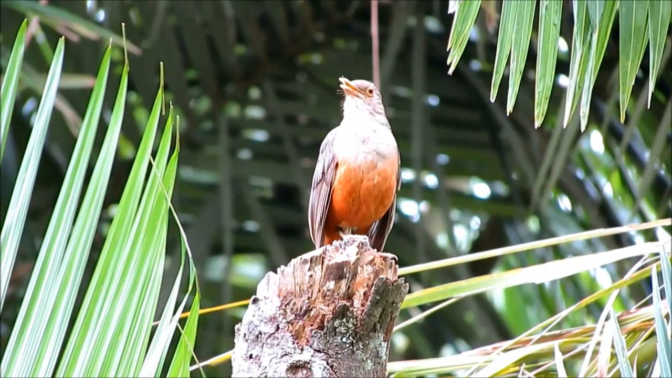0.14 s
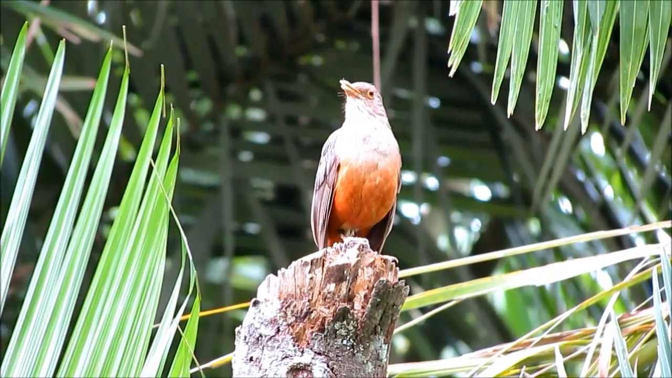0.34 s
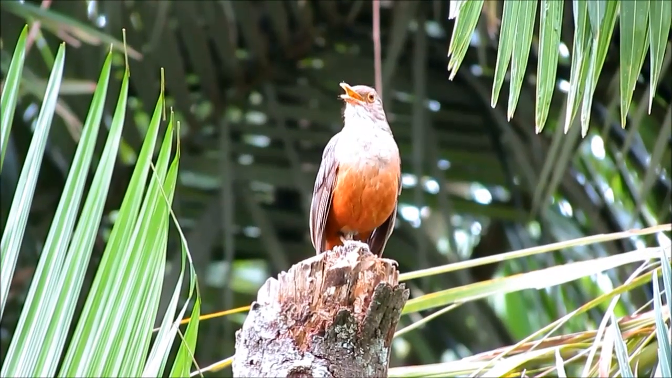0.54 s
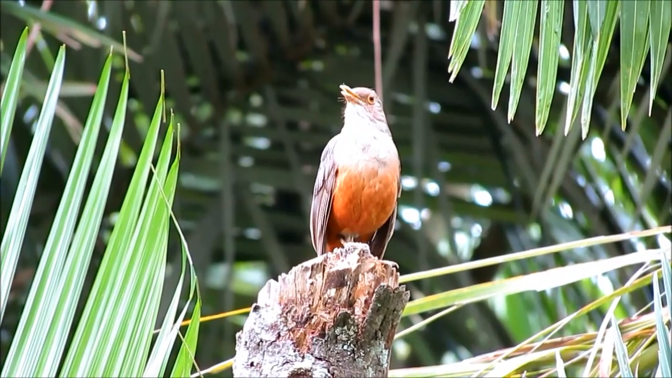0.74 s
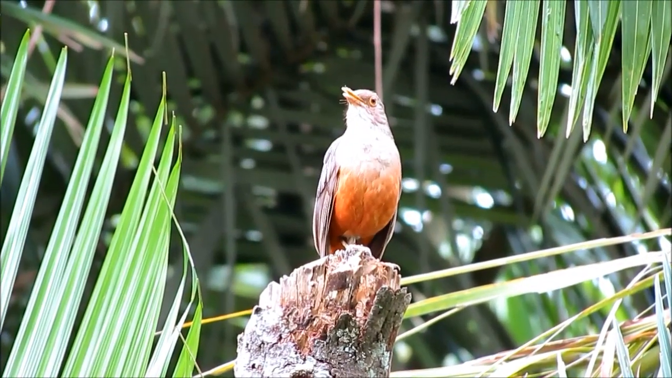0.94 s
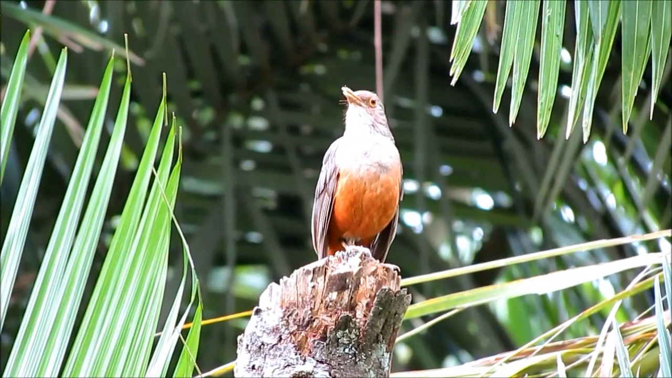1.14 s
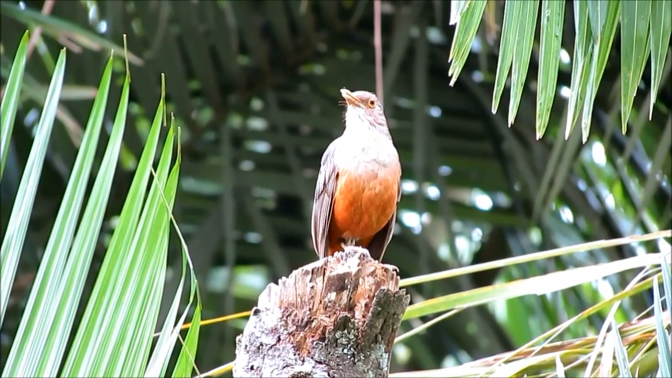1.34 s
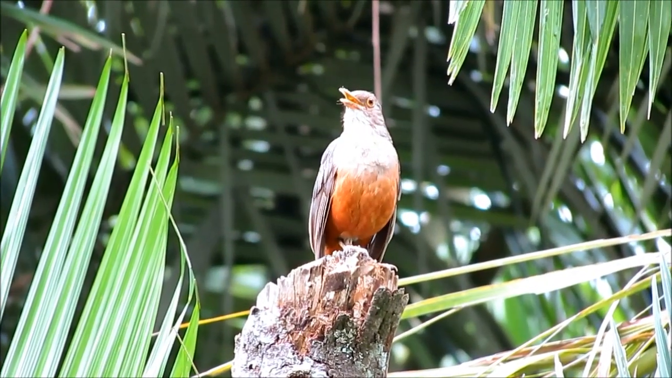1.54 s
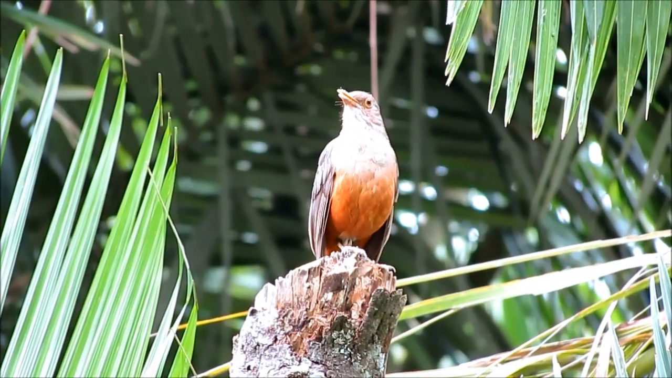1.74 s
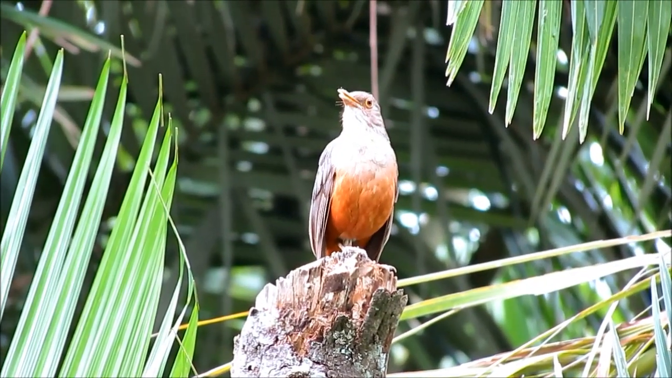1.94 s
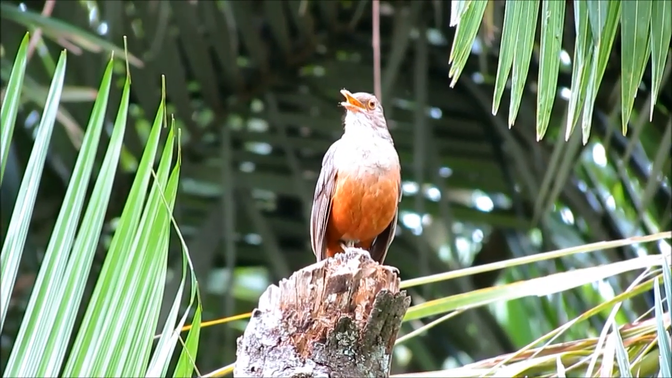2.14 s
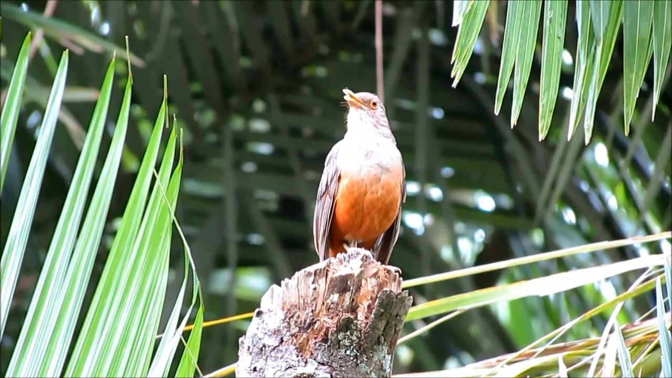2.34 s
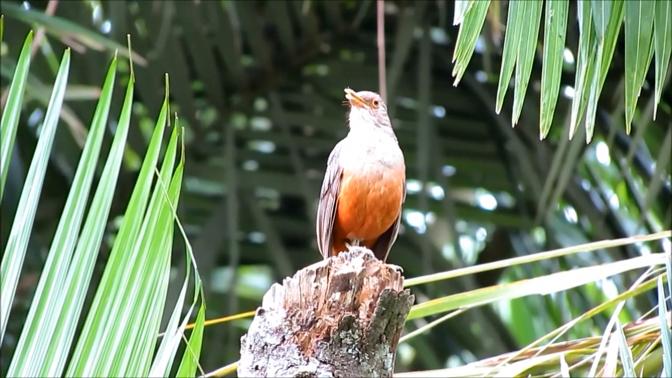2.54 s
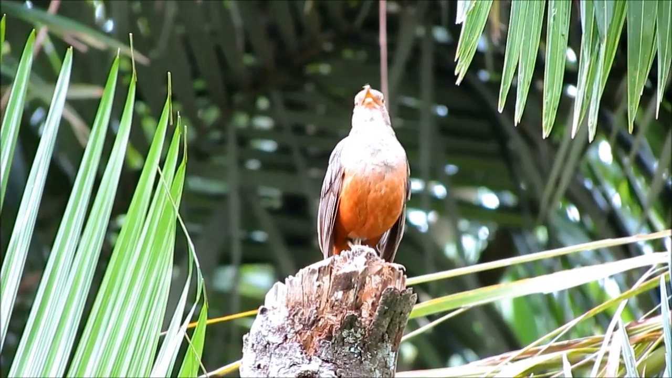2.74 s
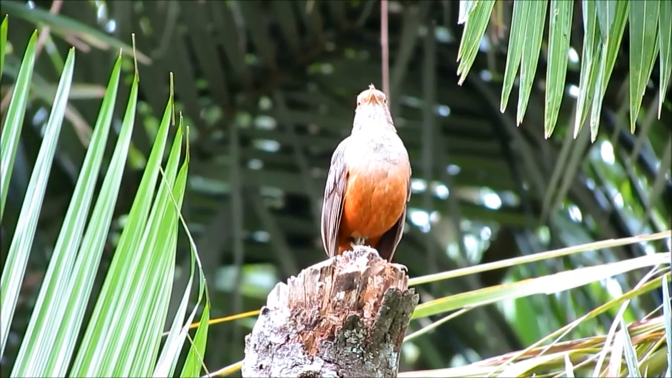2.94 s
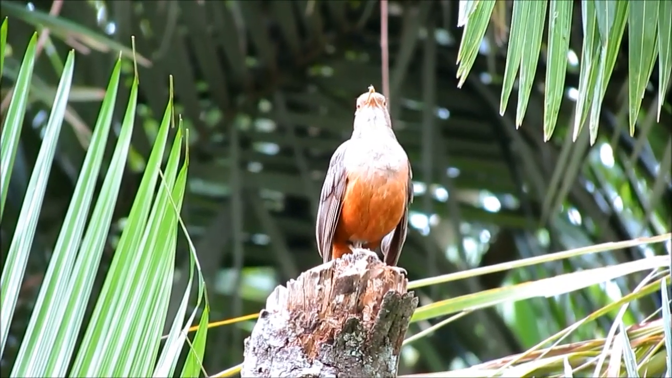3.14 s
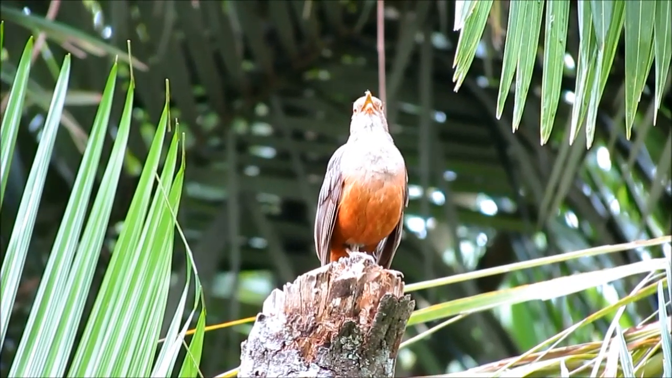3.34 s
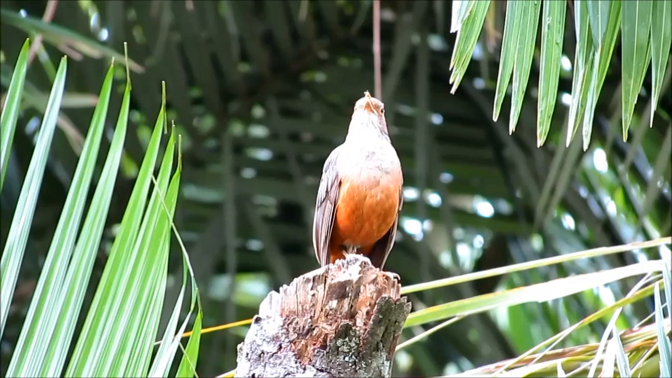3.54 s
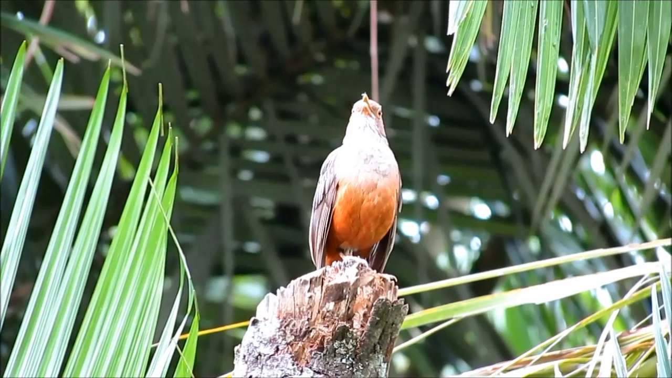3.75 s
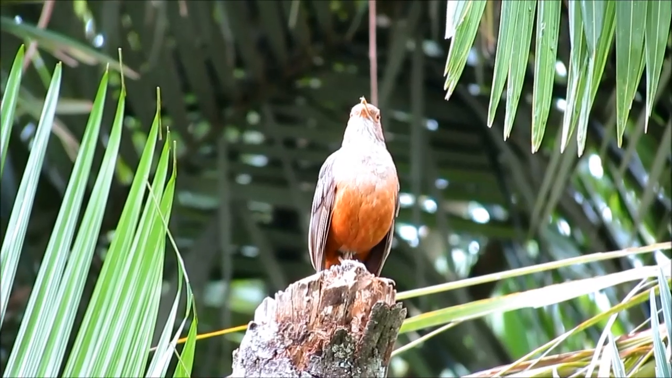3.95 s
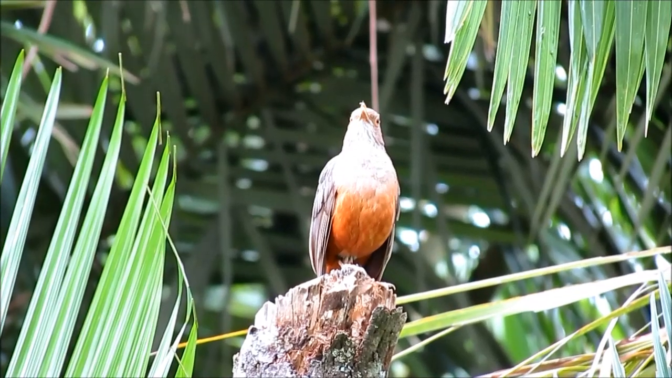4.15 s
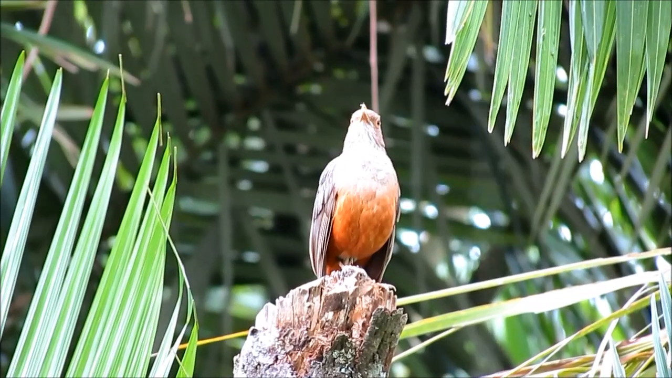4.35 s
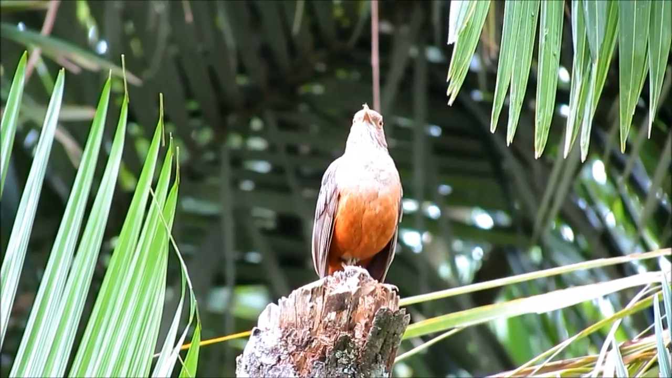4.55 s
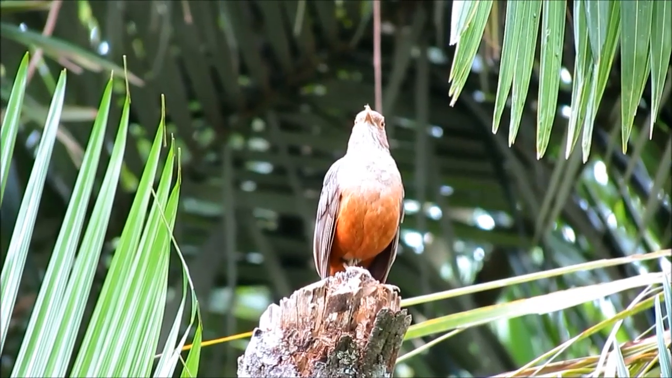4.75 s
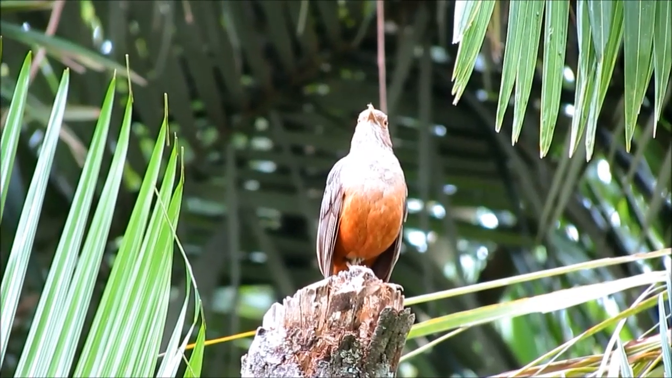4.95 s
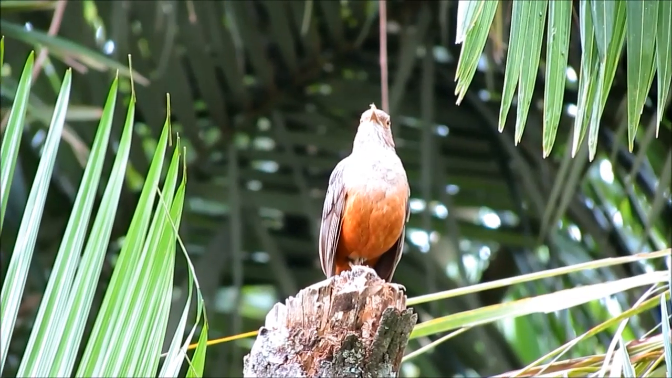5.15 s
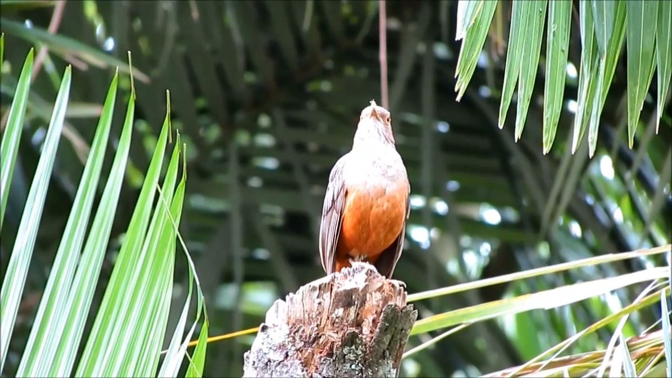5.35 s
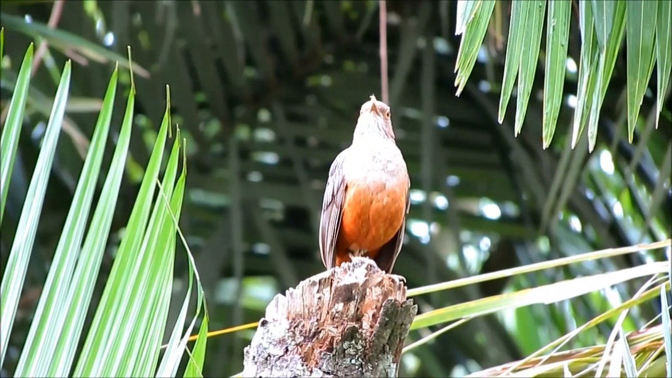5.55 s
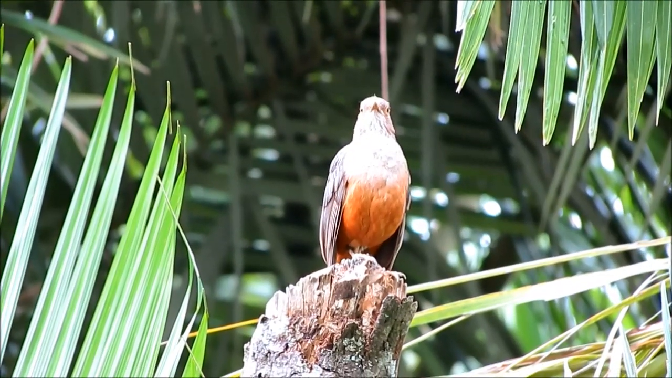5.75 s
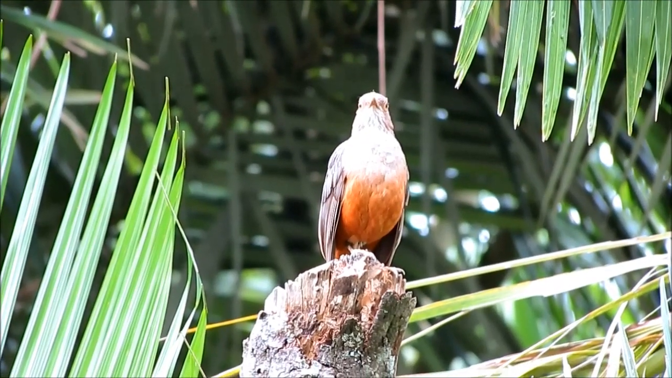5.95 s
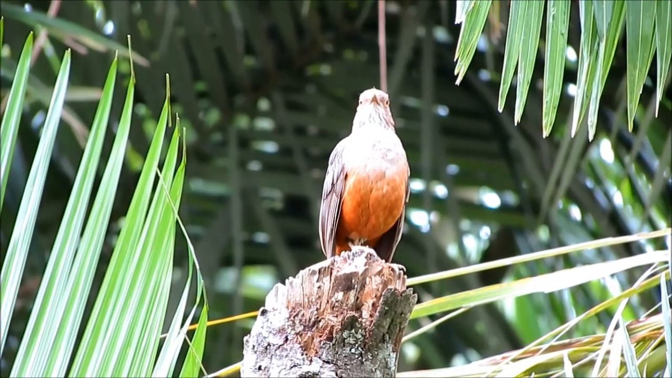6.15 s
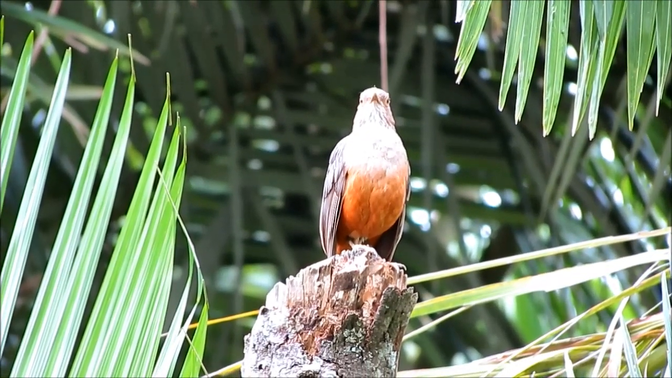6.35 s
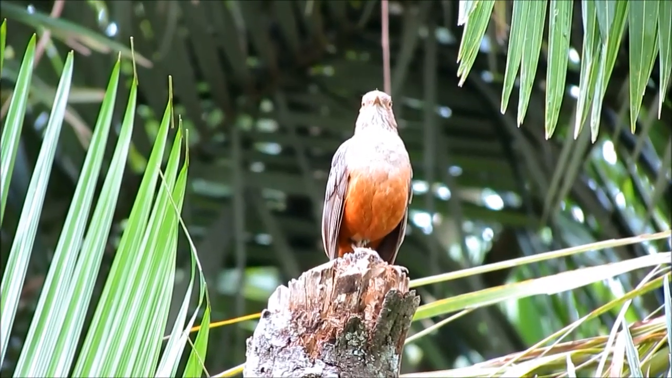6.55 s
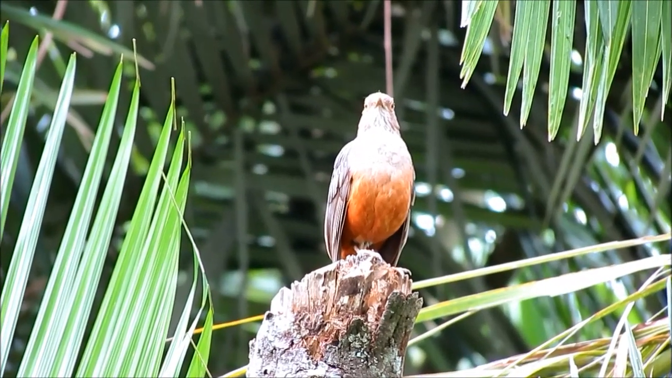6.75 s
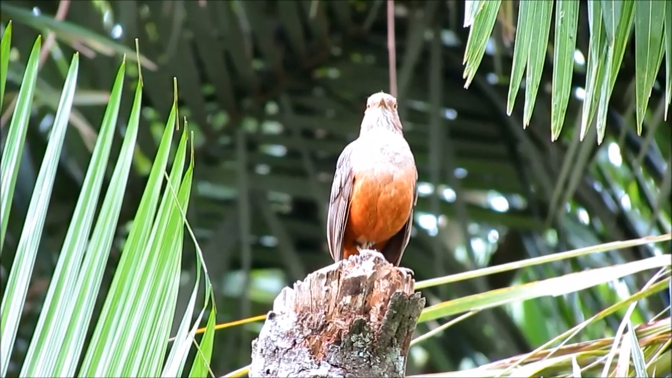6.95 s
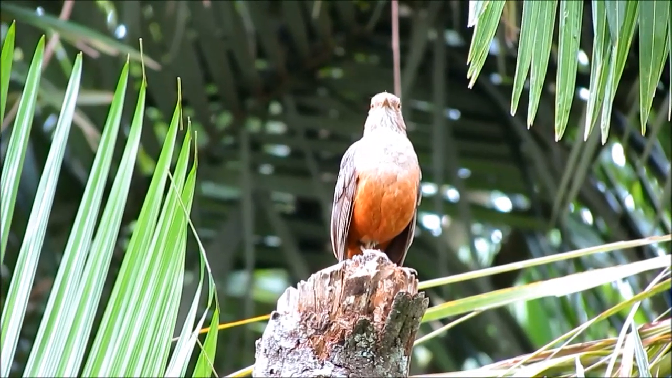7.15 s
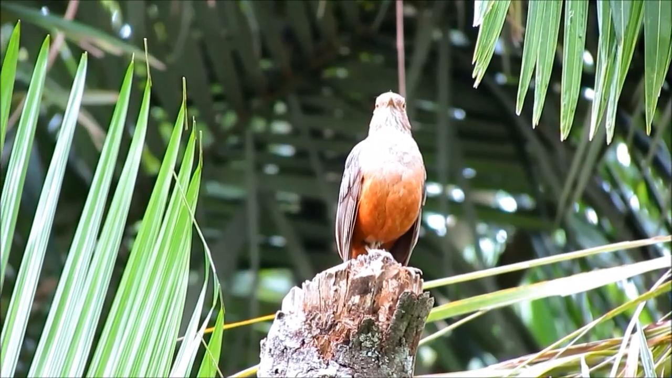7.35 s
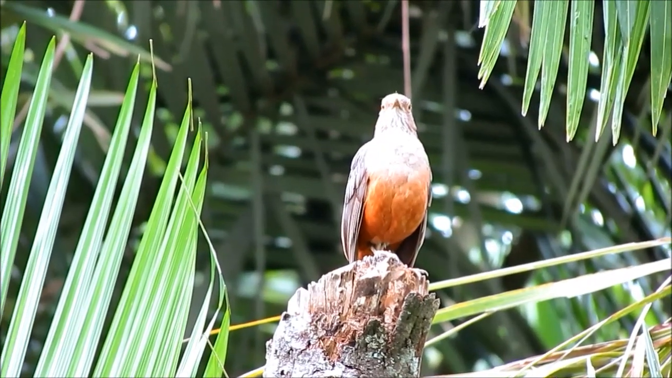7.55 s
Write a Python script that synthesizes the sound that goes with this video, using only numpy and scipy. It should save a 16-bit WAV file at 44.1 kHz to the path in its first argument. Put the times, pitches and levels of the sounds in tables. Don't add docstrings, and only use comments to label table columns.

```python
import sys
import numpy as np
from scipy import signal
from scipy.fft import rfft, irfft, next_fast_len
from scipy.io import wavfile
from scipy.ndimage import uniform_filter1d

SR = 44100
rng = np.random.default_rng(int(sys.argv[2]) if len(sys.argv) > 2 else 0)


def log_audio(samples):
    frames = np.atleast_2d(samples).T
    limited = np.clip(frames, -1, 1)
    pcm = np.round(limited * 32767).astype(np.int16)
    wavfile.write(sys.argv[1], SR, pcm)


def linear_from_db(decibels):
    return 10 ** (np.asarray(decibels, float) / 20)


N = 339129


def evened(x):
    return x / np.sqrt(np.mean(x ** 2) + 1e-20)


def smooth_noise(shape, width):
    once = uniform_filter1d(rng.standard_normal(shape), width)
    return evened(uniform_filter1d(once, width))


def read(points, hz):
    f, value = np.transpose(points)
    return np.interp(np.log(hz + 1), np.log(f + 1), value)


def coloured(x, points):
    size = next_fast_len(len(x))
    gain = linear_from_db(read(points, np.fft.rfftfreq(size, 1 / SR)))
    return irfft(rfft(x, size) * gain, size)[:len(x)]


def add(mix, s, sound, pan_db):
    part = mix[:, round(s * SR):][:, :len(sound)]
    part += linear_from_db(np.array([[pan_db / 2], [-pan_db / 2]])) * sound[:part.shape[1]]


def glide(rows, smooth_s):
    s, hz, db = np.transpose(rows)
    t = np.arange(s[0], max(s[-1], s[0] + .004), 1 / SR)
    hz = uniform_filter1d(np.interp(t, s, hz), int(smooth_s * SR), mode="nearest")
    ends = np.clip(np.minimum(t - t[0], t[-1] - t) / smooth_s, 0, 1)
    return t, hz, np.sqrt(2) * linear_from_db(np.interp(t, s, db)) * np.sin(np.pi / 2 * ends)


def opening(t, onset_s, onset_db):
    return onset_db * np.clip(1 - t / onset_s, 0, 1)


# f/Hz, t60/s
YARD_T60 = [(300, 0.98), (1000, 0.57), (2200, 0.49), (4000, 0.44), (7000, 0.46), (12000, 0.44)]
# delay/s, left/dB, right/dB
WALL_ECHOES = [(0.0141, -60, 12)]
# f/Hz, level/dB
WALL_COLOUR = [(2500, -8.5), (4500, -9), (6500, -3.5), (8500, -7)]


def yard(x, wet_db, wall_db, longer=0.85, direct_db=0.):
    taps = np.zeros((2, SR))
    at = np.arange(300, SR - 20, 20) + rng.integers(0, 20, (2, (SR - 301) // 20))
    np.put_along_axis(taps, at, rng.choice([-1., 1.], at.shape), 1)
    hz, t, z = signal.stft(taps, SR, nperseg=256)
    decay = linear_from_db(-60 * t / (longer * read(YARD_T60, hz)[:, None]))
    tail = signal.istft(z * decay, SR, nperseg=256)[1]
    tail *= linear_from_db(wet_db) / np.linalg.norm(tail[0])
    for s, left_db, right_db in WALL_ECHOES:
        echo = coloured(1. * (np.arange(tail.shape[1]) == round(s * SR)), WALL_COLOUR)
        tail += linear_from_db(wall_db + np.array([[left_db], [right_db]])) * echo
    source = x + 0.014 * x[::-1]
    reflected = signal.oaconvolve(source, tail[:, :SR * 3 // 4], axes=1)[:, :N]
    return linear_from_db(direct_db) * x + reflected


# f/Hz, level/dB per Hz
TOWN_COLOUR = [(12, -60.5), (20, -13.5), (70, -0.5), (141, -3.5), (538, -12.5), (602, -12.5), (711, -15),
               (915, -15.5), (1180, -20), (2870, -24), (4610, -25.5), (5770, -16.5), (7210, -31.5),
               (12600, -37), (15800, -45.5)]
# f/Hz, correlation
TOWN_LIKENESS = [(60, -0.76), (180, -0.72), (550, -0.67), (1650, -0.24), (4970, 0.09), (15000, 0.087)]
TOWN_DB = -49


def town():
    frames, hz = N // 256 + 5, np.fft.rfftfreq(1024, 1 / SR)
    a, b, c, d, patches = rng.standard_normal((frames, 513, 5)).T
    patches = evened(uniform_filter1d(uniform_filter1d(patches, 10, 0), 30, 1))
    same = np.clip(read(TOWN_LIKENESS, hz), -1, 1)[:, None]
    left = a + 1j * b
    right = same * left + np.sqrt(1 - same ** 2) * (c + 1j * d)
    z = np.array([left, right]) * linear_from_db(read(TOWN_COLOUR, hz)[:, None] + 1.5 * patches)
    return linear_from_db(TOWN_DB + 4) * evened(signal.istft(z, nperseg=1024, noverlap=768)[1][:, :N])


# f/Hz, level/dB
ENGINE_TONES = [(52, -56.5), (75, -56.5)]


def engine():
    out = np.zeros(N)
    for hz, db in ENGINE_TONES:
        waver, swell = smooth_noise((2, N), 4000)
        phase = 2 * np.pi * np.cumsum(hz * (1 + 0.0454 * waver)) / SR
        out += linear_from_db(db + 5.9 * swell) * np.sin(phase)
    return np.array([out, np.roll(out, 150)])


CRICKET_DB, TRILL_PERIOD_S, TRILL_S, STROKE_PERIOD_S = -41.5, .3385, .157, .0262


def cricket():
    t = np.arange(N) / SR
    since = (t - 6.474) % TRILL_PERIOD_S
    stroke = np.minimum((since / STROKE_PERIOD_S) % 1 / .5, 1)
    rasp = evened(uniform_filter1d(rng.standard_normal(N), 30))
    gain = np.sin(np.pi * stroke) ** .7 * (since < TRILL_S)
    hz = 5850 - 800 * stroke ** 2 + 140 * rasp
    tone = linear_from_db(CRICKET_DB) * gain * np.sin(2 * np.pi * np.cumsum(hz) / SR)
    return np.array([linear_from_db(-24.0) * np.roll(tone, 20), tone])


def blows(events, points, rise_s, t60, trim_db):
    out, t = np.zeros((2, N)), np.arange(6615) / SR
    for s, db, pan_db in events:
        burst = evened(coloured(rng.standard_normal(len(t)), points))
        add(out, s, linear_from_db(db + trim_db - 60 * t / t60) * np.minimum(t / rise_s, 1) * burst, pan_db)
    return out


# t/s, peak/dB, left-right/dB
TICKS = [(.0255, -34, -2), (.4125, -35, 3), (0.419, -19.5, 13), (.955, -25.5, -2), (1.1087, -25.5, 4),
         (1.117, -32, 4), (2.499, -26.5, 7.5), (2.952, -43, 2), (3.034, -27.5, 4), (5.4906, -31.5, 0),
         (5.5434, -32.5, 1), (6.0507, -29.5, -1), (6.382, -31, 4), (7.003, -29.5, 2.5)]
# f/Hz, level/dB
TWIG_COLOUR = [(1000, -26), (3000, -1.5), (6000, 5.5), (11000, -3.5), (16000, -6.5)]


def twigs():
    return blows(TICKS, TWIG_COLOUR, .003, .06, trim_db=-6)


# t/s, peak/dB, left-right/dB
SLAMS = [
    (0.412, -1, -6),
]
# f/Hz, level/dB per Hz
DOOR_COLOUR = [(88, -65), (150, -45), (310, -10.5), (410, -24.5), (520, -9.5), (781, -13), (1270, -4),
               (1630, -18.5), (1830, -13), (3830, -17), (5440, -13), (5990, -23), (15500, -37)]


def door():
    return blows(SLAMS, DOOR_COLOUR, 0.011, 0.044, trim_db=-0.5)


# t/s, peak/dB, left-right/dB
KNOCKS = [
    (5.485, -19.5, -12),
    (5.494, -17, 0),
    (5.562, -29.5, -4),
]
# f/Hz, level/dB per Hz
PLANK_COLOUR = [(88, -47), (170, -16), (400, -12), (601, 5), (718, -4.5), (1150, -2.5), (1300, -5),
                (1620, -5.5), (2010, -13), (4000, -21), (5200, -44), (8800, -120)]


def planks():
    return blows(KNOCKS, PLANK_COLOUR, 0.0062, 0.039, trim_db=0.5)


def yap(s, length, hz, db, top, onset_db, end_db, scoop=0.0973):
    t = np.linspace(0, length, 30)
    drop = np.clip((t / length - top) / (1 - top), 0, 1) ** 0.46
    level = db + opening(t, top * length, onset_db) + end_db * drop
    return np.transpose([s + t, hz * (1 - scoop * np.exp(-t / 0.0305)), level])


CLEAR_S, THROB_DB = .085, 3


def dog(yaps, muzzle, rasp, shake, clears=0.):
    out = np.zeros((2, N))
    for rows in yaps:
        t, hz, gain = glide(rows, 0.012)
        wobble = evened(uniform_filter1d(rng.standard_normal(len(t)), 200))
        phase = 2 * np.pi * np.cumsum(hz * (1 + shake * wobble)) / SR
        folds = evened(sum(np.cos(k * phase) for k in range(1, 16)))
        hoarse = rasp * (1 - clears * np.clip((t - t[0]) / CLEAR_S, 0, 1) ** 3)
        breath = hoarse * (1 + np.cos(phase)) * rng.standard_normal(len(t))
        throb = smooth_noise(len(t), 300)
        voice = evened(coloured(folds + breath, muzzle))
        add(out, t[0], gain * linear_from_db(THROB_DB * throb) * voice, -5.)
    return out


# t/s, length/s, f/Hz, effort/dB
FAR_YAPS = [
    (1.15, 0.28, 559, -62),
    (1.57, 0.23, 556, -61.5),
    (2.08, 0.12, 522.3, -54.5),
    (2.44, 0.18, 498, -61.5),
    (3.59, 0.2, 541, -62.5),
    (4.12, 0.26, 548, -65),
    (6.851, 0.069, 539, -66.5),
]
# f/Hz, level/dB
FAR_MUZZLE = [(300, -59), (530, 3), (1080, 2.5), (1600, -3.5), (3000, -28)]


def far_dog():
    yaps = [yap(*row, top=0.24, onset_db=3, end_db=-11.5) for row in FAR_YAPS]
    return dog(yaps, FAR_MUZZLE, rasp=0.69, shake=0.035)


# t/s, length/s, f/Hz, effort/dB
YAPS = [
    (3.885, 0.14, 562.5, -34),
    (6.198, 0.29, 517, -60.5),
]
# f/Hz, level/dB
MUZZLE = [(500, -22), (820, -14), (980, 14), (1130, 11.5), (1380, -6), (1700, 9.5), (2250, 3), (3500, -5.5),
          (8000, -27), (12000, -59)]


def yapping_dog():
    yaps = [yap(*row, top=0.56, onset_db=-11.5, end_db=-38) for row in YAPS]
    return dog(yaps, MUZZLE, rasp=1., shake=.018, clears=.4)


# t/s, length/s, f/Hz, effort/dB
LAST_YAP = [
    (7.514, 0.23, 503, -36),
]
# f/Hz, level/dB
LAST_MUZZLE = [(500, -31), (1010, 10), (1260, 8.5), (1520, 6), (2030, 7), (2540, -3), (3050, 4), (3550, -7),
               (4000, -17), (9000, -27)]


def last_yap():
    yaps = [yap(*row, top=0.41, onset_db=-18, end_db=-15, scoop=-0.091) for row in LAST_YAP]
    return dog(yaps, LAST_MUZZLE, rasp=1.7, shake=.014, clears=.6)


STRAIGHT, CREST_S = 0.33, 0.004
CHIRP_END_DB, CHIRP_DB_PER_OCTAVE = -3, 0.5


def fall(s, length, top_hz, end_hz, db, sink_s=0.01, fade_db_per_s=-140):
    t = np.linspace(0, length, 40)
    gone = t ** 2 / (t + CREST_S)
    last = np.exp(-gone[-1] / sink_s)
    left = (np.exp(-gone / sink_s) - last) / (1 - last)
    hz = end_hz + (top_hz - end_hz) * ((1 - STRAIGHT) * left + STRAIGHT * (1 - gone / gone[-1]))
    level = db + fade_db_per_s * t + CHIRP_END_DB * (t / length) ** 3
    level += CHIRP_DB_PER_OCTAVE * np.log2(hz / top_hz) + opening(t, .0025, -7)
    return np.transpose([s + t, hz, level])


FLICK_S, FLICK_FROM, FLICK_DB = 0.007, .81, -5


def hook(s, length, top_hz, end_hz, db):
    flick = (s - FLICK_S, FLICK_FROM * top_hz, db + FLICK_DB)
    return np.vstack([flick, (s, top_hz, db), fall(s, length, top_hz, end_hz, db)[6:]])


def note(db, swell_db, turns, onset_s=0.013, onset_db=-9):
    s, hz = np.transpose(turns)
    t = np.arange(s[0], s[-1], 1 / 2000)
    level = db + swell_db * (t - s[0]) / (s[-1] - s[0])
    level += opening(t - s[0], onset_s, onset_db) + opening(s[-1] - t, 0.0068, -10)
    return np.transpose([t, np.interp(t, s, hz), level])


def small_birds(chirps, fuzz=0.):
    out = np.zeros((2, N))
    waver = evened(uniform_filter1d(rng.standard_normal(N), 130))
    for pan_db, rows in chirps:
        t, hz, gain = glide(rows, 0.0008)
        drift = 1 + fuzz * waver[round(t[0] * SR):][:len(t)]
        phase = 2 * np.pi * np.cumsum(hz * drift) / SR
        add(out, t[0], gain * (np.sin(phase) + linear_from_db(-38) * np.sin(2 * phase)), pan_db)
    return np.array([out[0], np.roll(out[1], 34)])


# t/s, length/s, top f/Hz, end f/Hz, level/dB
FAR_CHIRPS = [
    (0., 0.013, 6550, 3300, -32),
    (0.429, 0.052, 5900, 5140, -24),
    (.455, 0.051, 5640, 5150, -32),
    (0.467, 0.035, 4800, 3800, -36),
    (0.489, 0.046, 8600, 4450, -27.5),
    (3.912, 0.032, 9900, 7860, -50),
    (7.32, 0.03, 6500, 4940, -39.5),
    (7.374, 0.036, 7700, 4670, -40),
]
# top t/s, fall/s, top f/Hz, end f/Hz, level/dB
FAR_HOOKS = [
    (3.04, 0.011, 7400, 4750, -34),
    (3.842, 0.04, 6580, 5180, -48),
]
# t/s, length/s, from f/Hz, to f/Hz, level/dB
LEFT_WHISTLES = [
    (0.176, 0.14, 1348, 1384, -56),
    (4.677, 0.071, 1462, 1334, -57),
    (4.8, 0.071, 5200, 3300, -55),
    (5.127, 0.15, 4550, 3110, -63),
    (7.356, 0.042, 7320, 7600, -42.5),
    (0., 0.0082, 2654, 2500, -32),
]
RIGHT_WHISTLES = [(5.12, .22, 4950, 4900, -52), (6.22, .1, 1560, 1500, -60), (4.28, .2, 1110, 1100, -62),
                  (4.83, .35, 1140, 1110, -62), (3.155, .03, 3420, 3270, -51), (4.26, .19, 2190, 2180, -62),
                  (4.655, .015, 3350, 3000, -55), (4.7, .05, 2950, 2600, -63), (4.73, .13, 2140, 2370, -61),
                  (5.94, .1, 2720, 2680, -58), (6.708, .022, 2420, 2440, -59), (1.8, .055, 2300, 2680, -50),
                  (.82, .12, 2850, 2650, -54), (1.15, .03, 2900, 3000, -53), (1.27, .1, 2500, 2900, -60),
                  (1.355, .04, 3350, 3600, -58), (1.85, .12, 3000, 3600, -59), (6.26, .08, 3300, 2400, -62)]


def far_birds():
    far = [(2.5, fall(*row)) for row in FAR_CHIRPS] + [(0.1, hook(*row)) for row in FAR_HOOKS]
    faint = []
    for pan_db, rows in ((1.5, LEFT_WHISTLES), (-9.0, RIGHT_WHISTLES)):
        faint += [(pan_db, fall(*row, .15, -25)) for row in rows]
    calls = small_birds(far) + small_birds(faint, fuzz=.025)
    return yard(calls, wet_db=3.5, wall_db=-12, direct_db=-12)


# t/s, f/Hz, level/dB
DART = [
    (6.742, 4940, -38),
    (6.744, 6150, -36.5),
    (6.75, 7000, -27.5),
    (6.756, 7540, -38),
    (6.76, 5820, -31.5),
    (6.767, 3600, -53),
]


def darting_bird():
    echoed = small_birds([(2.5, np.add(DART, [0, 0, -12.5]))])
    return small_birds([(1.5, DART)]) + yard(echoed, wet_db=3.0, wall_db=-1.5)


# t/s, length/s, top f/Hz, end f/Hz, level/dB
CHIRPS = [ (0.097, 0.044, 6580, 3540, -23.5), (0.174, 0.017, 8600, 5440, -29.5),
          (0.201, 0.071, 4660, 3040, -37), (.37, 0.022, 5960, 4940, -24), (0.387, 0.011, 6900, 4400, -31),
          (3.734, 0.021, 9060, 6740, -47.5), (3.764, 0.025, 9750, 6160, -51),
          (3.906, 0.031, 9150, 6700, -49), (4.904, 0.016, 6370, 3790, -35), (5.297, 0.011, 8630, 4980, -32),
          (5.359, 0.014, 9370, 7200, -33), (5.369, 0.014, 9350, 6150, -57), (5.387, 0.024, 6020, 3690, -28),
          (5.915, 0.023, 7840, 3960, -27.5), (5.99, 0.021, 8800, 4300, -28.5)]
SHELVES = [
    (4.495, 0.017, 8900, 9340, -50),
]
# top t/s, fall/s, top f/Hz, end f/Hz, level/dB
HOOKS = [
    (1.728, 0.019, 7630, 4830, -43),
    (4.509, 0.024, 7620, 3730, -37.5),
]
# t/s, length/s, from f/Hz, to f/Hz, level/dB
SLIDES = [
    (.745, .066, 4520, 3450, -28),
    (.578, .045, 2950, 3700, -31),
]
# [t/s, f/Hz]
SWOOPS = [
    (-34.5, 12.5, [(.024, 9800), (.037, 9880), (.042, 8840), (.052, 6080)]),
    (-26, 3, [(.695, 6470), (.703, 8510), (.722, 5680)]),
    (-23.5, -17, [(.94, 6830), (.947, 8300), (.965, 4190), (.99, 3410), (1.03, 2790)]),
    (-35, 0.5, [(4.198, 6900), (4.202, 6420), (4.209, 5340), (4.221, 5140)]),
    (-41.5, 3, [(4.251, 8500), (4.256, 7800), (4.265, 5200), (4.277, 4230)]),
    (-34, -2.5, [(5.02, 9540), (5.026, 8830), (5.032, 6500), (5.039, 5074), (5.075, 4950)]),
    (-29, -19, [(5.699, 8220), (5.712, 4900), (5.73, 4090), (5.78, 2920)]),
]


def near_birds():
    calls = [note(*row, 0.0059, -6) for row in SWOOPS]
    calls += [fall(*row) for row in CHIRPS + SHELVES] + [hook(*row) for row in HOOKS]
    near = [(3, rows) for rows in calls]
    near += [(2.5, fall(*row, .15, -63)) for row in SLIDES]
    return yard(small_birds(near), wet_db=3.0, wall_db=-1.5)


def leap(s, from_hz, over_hz, to_hz, db, length=0.015):
    hz = np.array([from_hz, over_hz, to_hz])
    return np.transpose([s + length * np.array([0, 0.47, 1]), hz, db - 26.5 * np.log2(hz / from_hz)])


# [t/s, f/Hz]
SLURS = [
    (-28.5, 6.2, [(.442, 3400), (.472, 3000), (.5, 2660), (.55, 2395), (.637, 2522)]),
    (-33, 13, [(.785, 2255), (.85, 2066), (.89, 2016), (.99, 2267)]),
    (-29.5, 7, [(2.09, 3240), (2.115, 3003), (2.149, 2442), (2.217, 2422), (2.237, 2683), (2.262, 2636)]),
    (-25.5, 5.8, [(2.73, 3280), (2.79, 2716), (2.834, 2500), (2.878, 2451), (2.93, 2380)]),
]
DIPS = [
    (-28, 0.5, [(.178, 2433), (.218, 2195), (.268, 2088), (.305, 2160)]),
    (-22.5, -2, [(2.46, 2320), (2.498, 2182), (2.548, 2075), (2.58, 2108)]),
    (-28, 3, [(3.196, 2190), (3.23, 1977), (3.28, 2101), (3.308, 2124)]),
]
PIPS = [ (-40, 12.5, [(.125, 2180), (.167, 1948), (.175, 2080)]), (-59.5, 35.5, [(1.14, 1404),
        (1.192, 1566), (1.226, 1891)]), (-30, -7, [(1.224, 1912), (1.25, 1824), (1.294, 1555),
        (1.31, 1670)]), (-39.5, 19.5, [(1.476, 2372), (1.568, 2331), (1.65, 2231)]),
        (-50, 12, [(1.838, 1560), (1.866, 1750)]), (-27.5, -19.5, [(1.86, 1780), (1.875, 1790),
        (1.921, 1620)]), (-35, 8, [(1.921, 1656), (1.955, 1867)]), (-33, -1.5, [(1.953, 2190),
        (1.985, 1990)]), (-35, -2, [(1.872, 2090), (1.883, 2340), (1.898, 1920)]),
        (-32.5, 9.5, [(2.388, 2022), (2.432, 1950), (2.442, 2010)]), (-44.5, 18, [(3.11, 1667),
        (3.15, 1770), (3.178, 1693)]), (-25, 1.5, [(3.372, 2391), (3.456, 2280), (3.538, 2239)]),
        (-32.5, 6, [(3.743, 2395), (3.76, 2435)]), (-27.5, -13, [(3.783, 2144), (3.812, 2170)]),
        (-32.5, 13.5, [(3.918, 2114), (3.932, 2260)])]
# t/s, from f/Hz, over f/Hz, to f/Hz, level/dB
LEAPS = [
    (2.439, 2015, 2640, 2270, -21),
    (3.181, 1904, 2650, 2000, -21),
]
FLIPS = [
    (3.758, 2420, 3200, 4330, -27.5),
    (3.931, 2190, 2800, 3400, -27),
]
# start t/s, end t/s, shakes/Hz, first swing/Hz, last swing/Hz, loss at top/dB
TRILLS = [
    (1.477, 1.607, 40.5, 375, 228, -2.5),
    (2.121, 2.224, 53, 162, 130, 1.5),
    (3.404, 3.548, 55.5, 115, 90, -1.5),
]
# f/Hz, level/dB
BEAK = [(3500, -14), (4300, -28.5), (6200, -39.5), (7400, -22.5), (8500, -28.5), (10200, -39.5),
        (12200, -46), (14500, -49), (16000, -58)]
EVEN_DB = -8


def thrush():
    out = np.zeros((2, N))
    song = [note(*row, 0.024, -16) for row in SLURS] + [note(*row) for row in DIPS + PIPS]
    song += [leap(*row) for row in LEAPS] + [leap(*row, .009) for row in FLIPS]
    for rows in song:
        t, hz, gain = glide(rows, 0.0028)
        for start, end, rate_hz, first_hz, last_hz, top_db in TRILLS:
            beat = 2 * np.pi * rate_hz * (t - start)
            sweep = np.sin(beat) + 0.046 * np.sin(2 * beat)
            on = np.clip(np.minimum(t - start, end - t) / 0.0036, 0, 1)
            hz = hz + on * np.interp(t, [start, end], [first_hz, last_hz]) * sweep
            gain = gain * linear_from_db(on * (-3.5 * np.cos(beat) + top_db * np.sin(beat)))
        phase = 2 * np.pi * np.cumsum(hz) / SR
        tone = np.sin(phase)
        for k in range(2, 8):
            if k * hz.min() < 16000:
                tone = tone + linear_from_db(read(BEAK, k * hz) + EVEN_DB * (1.5 - k % 2)) * np.sin(k * phase)
        add(out, t[0], gain * tone, -6.5)
    return out


def scene():
    insect = yard(cricket(), wet_db=-10, wall_db=-20, longer=.5)
    struck = yard(twigs() + door() + planks(), wet_db=-5, wall_db=-12, longer=.5, direct_db=-1.5)
    barks = far_dog() + yapping_dog() + last_yap()
    dogs = yard(barks, wet_db=3.5, wall_db=-5.0, longer=1.1, direct_db=-1.5)
    birds = far_birds() + darting_bird() + near_birds()
    song = yard(thrush(), wet_db=-3.5, wall_db=-6)
    return town() + engine() + insect + struck + dogs + birds + song


# f/Hz, level/dB
SIDE_LIFT = [(300, -1.1), (1000, -2), (2500, 0.5), (5000, -2), (8000, 0.5), (13000, 2.5)]
# f/Hz, level/dB
BAND_EDGE = [(15700, 0), (15900, -50)]


def camera(dry):
    mid = coloured((dry[0] + dry[1]) / 2, BAND_EDGE)
    side = coloured((dry[0] - dry[1]) / 2, SIDE_LIFT + BAND_EDGE)
    return np.array([mid + side, mid - side])


def top_cut(x):
    return signal.sosfilt(signal.butter(12, 15900, fs=SR, output="sos"), x)


def record(dry):
    mix = camera(dry)
    return top_cut(mix)


dry = scene()
out = record(dry)
log_audio(out)
```